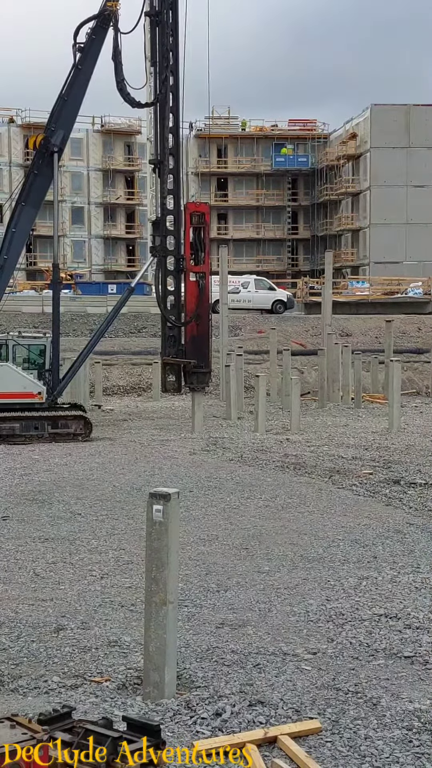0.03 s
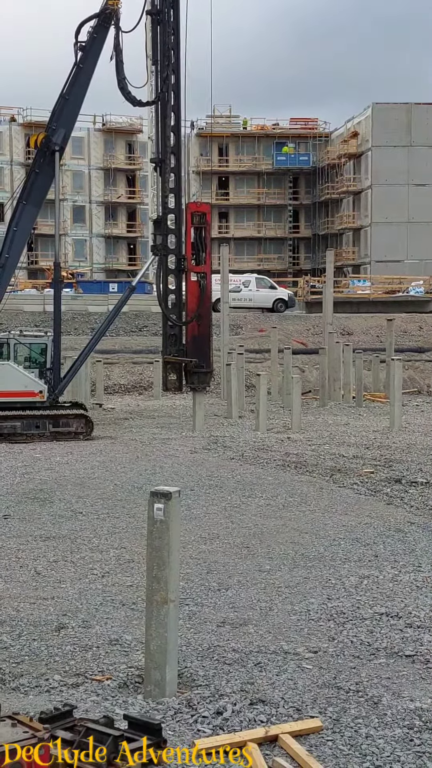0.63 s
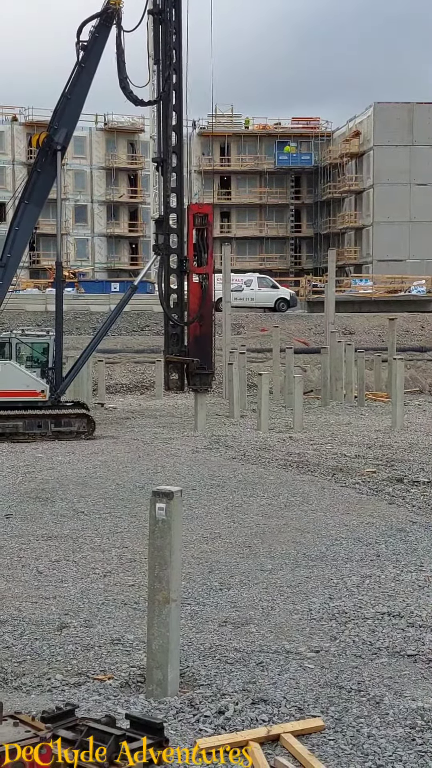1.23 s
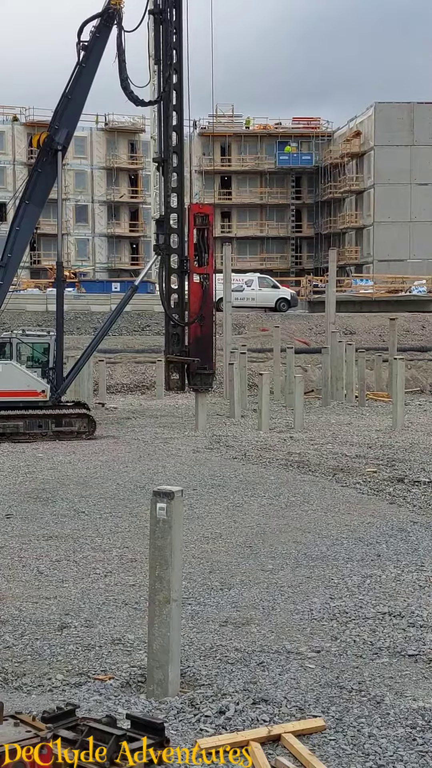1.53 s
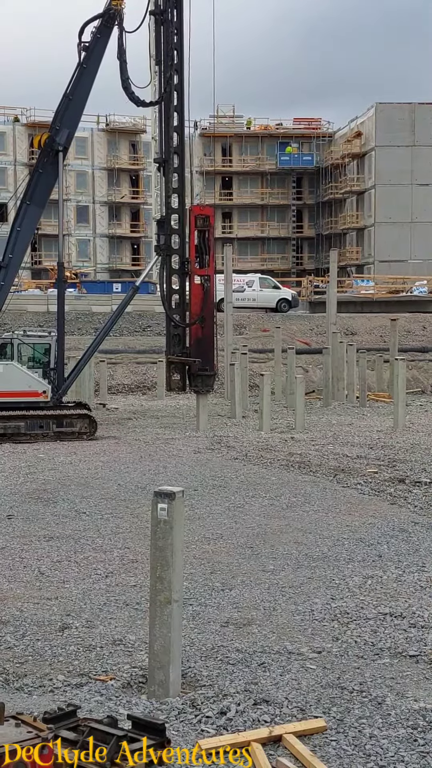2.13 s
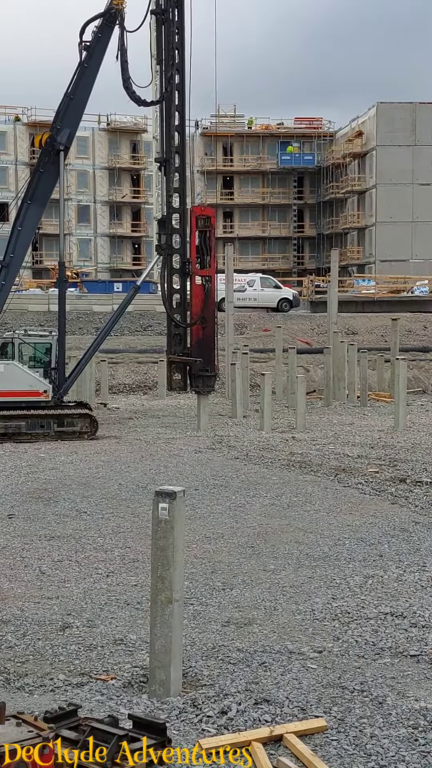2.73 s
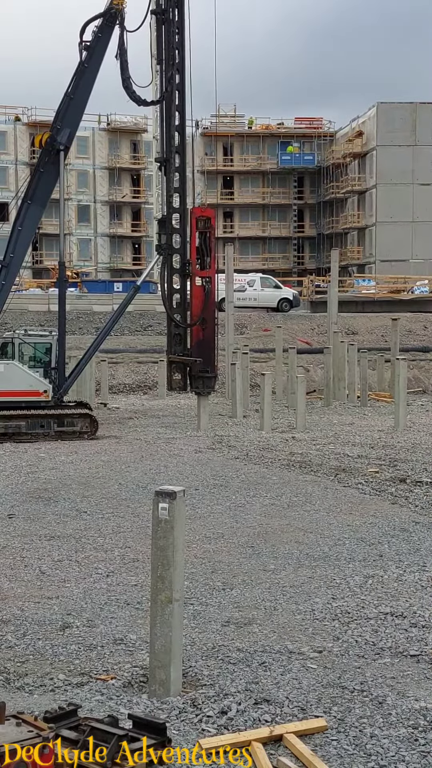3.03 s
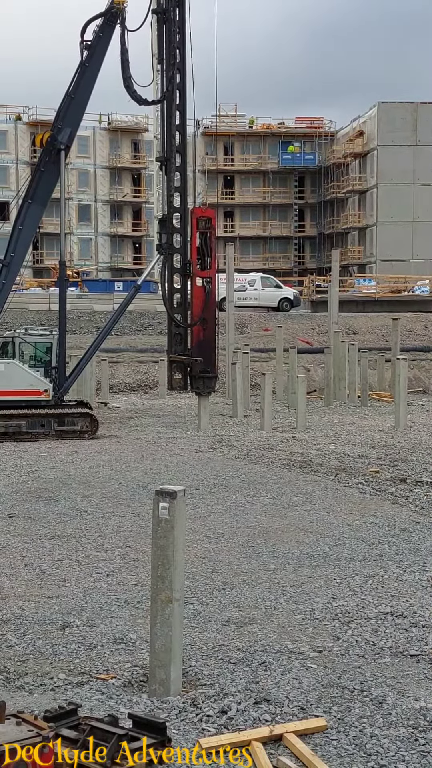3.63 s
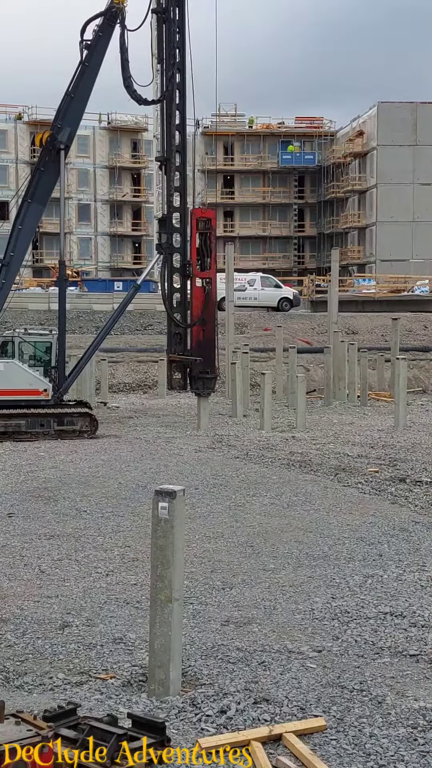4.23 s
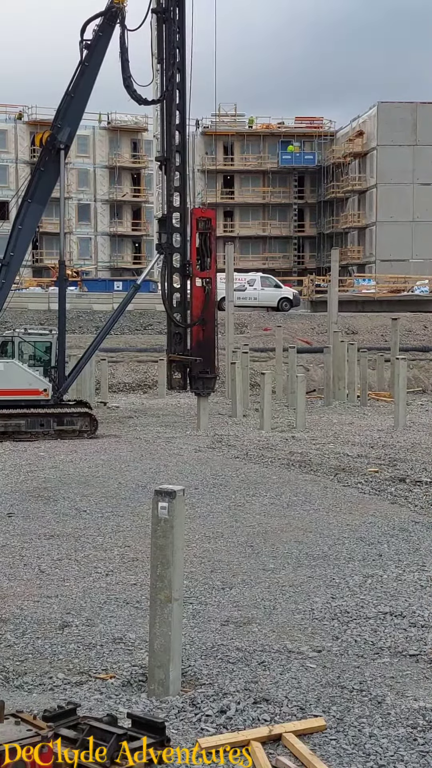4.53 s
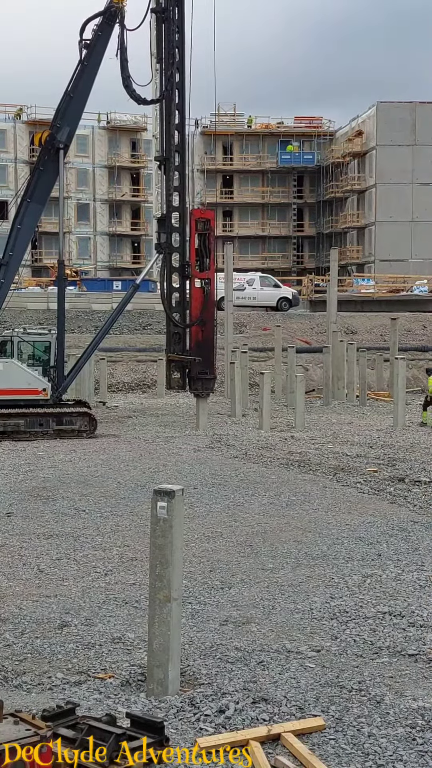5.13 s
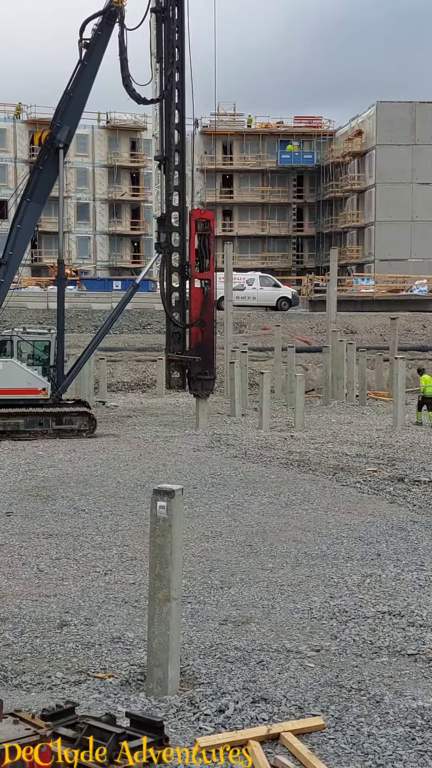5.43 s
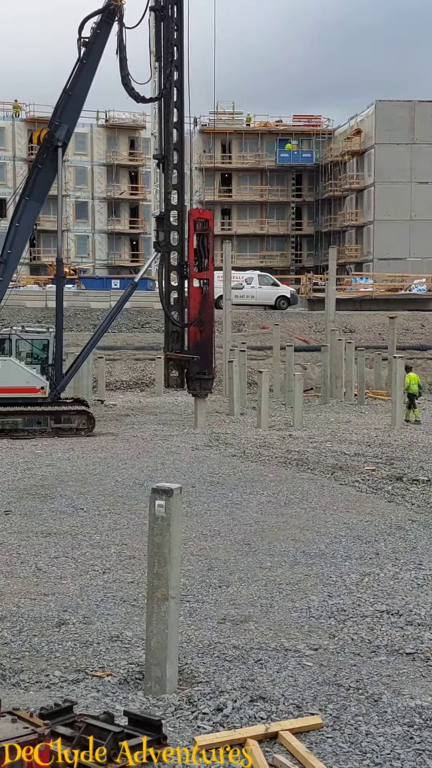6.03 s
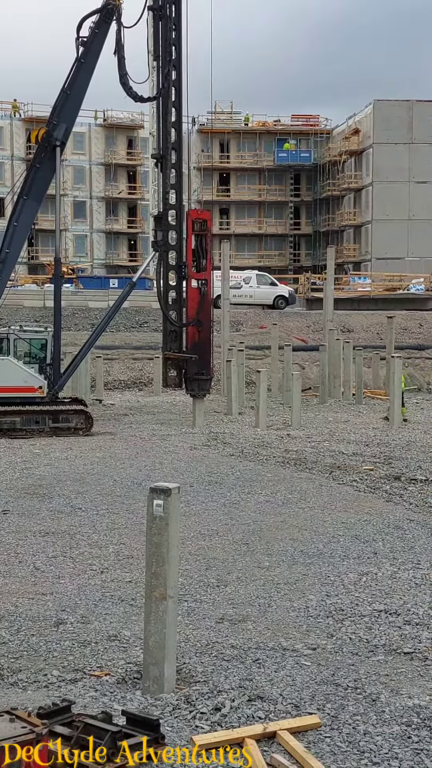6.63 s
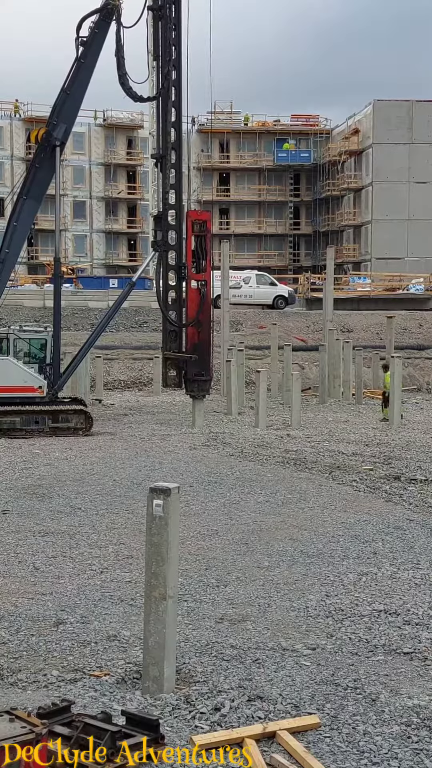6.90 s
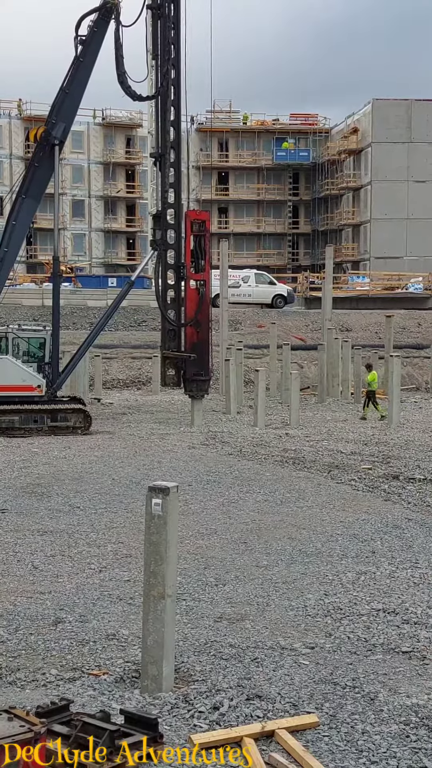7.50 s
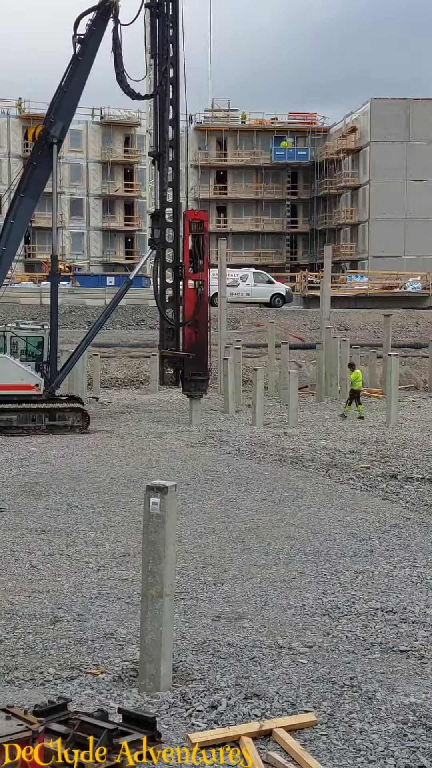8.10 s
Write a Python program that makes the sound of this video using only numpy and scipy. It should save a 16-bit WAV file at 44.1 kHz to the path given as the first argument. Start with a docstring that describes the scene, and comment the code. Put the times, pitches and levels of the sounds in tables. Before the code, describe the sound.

Over the low rumble of a diesel engine, a pile driver pounds away outdoors in an even rhythm of nearly two blows a second. The lift clacks, the ram lands with a sharp, heavy thud, and the steel casing slams and rattles, with light grinding and chain chinks. Each hit rings out across the building site with a short echo. A few low puffs of wind reach the microphone toward the end.

```python
"""A hydraulic drop hammer drives a concrete pile on an open gravel site, about twice a second.
Each blow is a deep thud and a second landing; the steel casing then slams, booms and grinds in its
guides, chains chink, and the lift lets the ram go again with a clack. The rig's diesel drones
underneath, a block of flats throws the noise back, and wind puffs on the microphone near the end."""
import sys
import numpy as np
from scipy import signal
from scipy.fft import rfft, irfft, next_fast_len
from scipy.io import wavfile
from scipy.ndimage import map_coordinates

SR = 44100
rng = np.random.default_rng(int(sys.argv[2]) if len(sys.argv) > 2 else 0)


def file_out(sig):
    """Save sig as 16-bit WAV at sys.argv[1]."""
    # one column per channel
    cols = np.atleast_2d(sig).T
    # limit, then scale
    lim = np.clip(cols, -1, 1)
    pcm = np.round(lim * 32767).astype(np.int16)
    wavfile.write(sys.argv[1], SR, pcm)


N = 368676
TOP_HZ = 15827
FALL_S = .2355  # release to impact

# ram blows: t/s, hop to second landing/s, clatter brightness/dB, grinding/dB, chink/dB
RAM_BLOWS = [(0.1791, 0.026, 0.5, -48, -30), (0.7552, 0.033, -1, -44.5, -27), (1.3221, 0.028, 0, -52, -26),
             (1.8854, 0.029, 1.5, -40, -26), (2.4586, .0313, -0.5, -42, -21.5),
             (3.0237, .0258, 1.5, -40, -18.5), (3.5854, .0235, 0, -40, -19.5),
             (4.15, .0243, -0.5, -46, -36), (4.7088, 0.028, 0.5, -49, -26), (5.264, 0.028, 2, -47, -29),
             (5.8272, 0.025, 1, -55, -23), (6.3968, 0.026, -0.5, -41, -19), (6.9553, 0.025, -1, -60, -34),
             (7.5046, .0232, -1, -60, -32), (8.0667, .0239, 0, -55, -31)]
# two casing slams per blow: delay/s, level/dB, brightness/dB, rise/s, t60/s
CASING_SLAMS = [(.042, -14, -1.9, .013, .2), (.079, -15, 1.3, .006, .25)]


def amp(db):
    """Decibels to gain."""
    return 10 ** (np.asarray(db) / 20)


def unit(x):
    """Scale to rms 1."""
    return x / np.sqrt(np.mean(x ** 2) + 1e-20)


def along(points, hz):
    """Interpolate (f/Hz, value) points over log frequency."""
    f, v = np.transpose(points)
    return np.interp(np.log(hz + 1), np.log(f + 1), v)


def clock(length_s):
    """Sample times."""
    return np.arange(int(length_s * SR)) / SR


def fade(t, t60_s):
    """Exponential decay, 60 dB in t60_s."""
    return np.exp(-np.log(1000) * t / t60_s)


def onset(t, rise_s):
    """Exponential rise to 1."""
    return 1 - np.exp(-t / rise_s)


def add(track, at_s, sound):
    """Mix sound into track; at_s may be negative."""
    start = round(at_s * SR)
    sound = sound[..., max(-start, 0):]
    part = track[..., max(start, 0):][..., :sound.shape[-1]]
    part += sound[..., :part.shape[-1]]


def wobble(rate_hz):
    """Smooth random curve."""
    knots = rng.standard_normal(int(N * rate_hz / SR) + 4)
    return map_coordinates(knots, [np.arange(N) * rate_hz / SR])


def filtered(x, response):
    """Apply response(f/Hz) by FFT."""
    size = next_fast_len(x.shape[-1] + 8192)
    return irfft(rfft(x, size) * response(np.fft.rfftfreq(size, 1 / SR)), size)[..., :x.shape[-1]]


def shaped(x, spectrum):
    """Zero-phase filter from (f/Hz, gain/dB) points."""
    return filtered(x, lambda hz: amp(along(spectrum, hz)))


def through(x, response):
    """Convolve a pair of tracks with an impulse response."""
    return signal.fftconvolve(x, np.atleast_2d(response), axes=1)[:, :N]


def body(spectrum, size=4096):
    """Minimum-phase impulse response, energy 1."""
    cepstrum = irfft(np.log(amp(along(spectrum, np.fft.rfftfreq(size, 1 / SR)))))
    cepstrum[1:size // 2] *= 2
    cepstrum[size // 2 + 1:] = 0
    response = irfft(np.exp(rfft(cepstrum)))
    return response / np.linalg.norm(response)


def hiss(spectrum):
    """Mid/side noise, rms 1."""
    return unit(shaped(rng.standard_normal((2, N)), spectrum))


def rattle(t, t60_s, rise_s, spiky_db):
    """Mid/side force of many small, uneven contacts, dying away."""
    sizes = amp(spiky_db * np.interp(t, np.arange(len(t)) / 700, rng.standard_normal(len(t))))
    return unit(sizes * rng.standard_normal((2, len(t)))) * fade(t, t60_s) * onset(t, rise_s)


def jingle(t, spread_s, t60_s, lowest_hz, count):
    """Mid/side ring of loose parts: one brief note each, later ones weaker."""
    wait, pitch, pan = rng.random((3, count, 1))
    age_s = np.maximum(t + spread_s * np.log(1 - wait), 0)
    hz = lowest_hz + pitch * (TOP_HZ - lowest_hz)
    notes = np.sin(2 * np.pi * hz * age_s) * fade(age_s, t60_s) * (1 - wait) ** .5
    mid = notes.sum(0)
    side = (notes * np.cos(2 * np.pi * pan)).sum(0) * np.sqrt(2)
    return np.array([mid, side]) / np.sqrt(np.sum(mid ** 2) / (SR * spread_s))


def slams(hits, t60_s, rise_s, spiky_db, treble_db, jingle_db, scatter_db=.5):
    """Rattle plus shaken loose parts for each hit (t/s, level/dB, brightness/dB)."""
    force, t = np.zeros((2, N)), clock(.22)
    for at_s, db, bright_db in hits:
        notes = jingle(t, spread_s=.035, t60_s=.04, lowest_hz=4200, count=40)
        hit = rattle(t, t60_s, rise_s, spiky_db) + amp(jingle_db) * notes
        hit = shaped(hit, [(2200, 0), (4200, bright_db + treble_db)])
        add(force, at_s - rise_s / 4, amp(db + rng.normal(0, scatter_db)) * hit)
    return force


def diesel(firing_hz=43.63):
    """Low engine orders, the higher the less steady, over exhaust rumble and site wash."""
    orders = [(1, -35), (2, -32), (3, -42.5)]  # engine orders: multiple of firing rate, level/dB
    exhaust = [(20, -48), (33, -30), (43, -22), (55, 3.5), (70, -3), (88, -6.5), (105, -17), (128, -7.5),
               (180, -11), (300, -53.5)]  # exhaust spectrum: f/Hz, level/dB
    site = [(25, -40), (40, -13), (110, -6.5), (180, -3.5), (300, -6), (450, -6.5), (800, -15),
            (1150, -21.5), (1350, -19.5), (1600, -19.5), (2400, -31), (4800, -39.5), (7000, -48),
            (12500, -65), (16000, -76)]  # ambient spectrum: f/Hz, level/dB
    phase = 2 * np.pi * np.cumsum(firing_hz * (1 + .014 * wobble(5))) / SR
    drone = sum(amp(db + .9 * k * wobble(4)) * np.sin(k * phase + rng.uniform(0, 2 * np.pi))
                for k, db in orders)
    wash = amp(-36.5 + .3 * wobble(5.5)) * hiss(site)
    return drone * np.array([[1], [0]]) + amp(-37.5) * hiss(exhaust) + wash


def lift():
    """The lift lets go of the ram at the top of each stroke: a hollow clack."""
    latch = [(100, -23), (240, -6), (315, 4), (355, 2), (400, 1), (520, -4.5), (780, -12.5), (1130, -10),
             (1350, -20), (1600, -14.5), (1880, -21.5), (2200, -21.5), (4000, -28), (5100, -26.5),
             (6500, -36), (12500, -43), (16000, -51)]  # latch spectrum: f/Hz, level/dB
    releases = [(at_s - FALL_S, -23, -1) for at_s, *_ in RAM_BLOWS]
    force = slams(releases, t60_s=.22, rise_s=.00604, spiky_db=1, treble_db=-6.5, jingle_db=-7.5)
    return amp(4.5) * through(force, body(latch))


def chinks(swing_s=.149, slack_s=.047, slack_db=-30, scatter_s=.013):
    """Chains chink as they swing back after a blow and go slack after a release."""
    # chain spectrum: f/Hz, level/dB
    chain = [(200, -12), (1000, 11.5), (3000, 2.5), (4800, -7), (6500, -16), (8000, -11.5),
             (10000, -17), (12500, -18.5), (16000, -55)]
    force, t = np.zeros((2, N)), clock(.15)
    for at_s, *_, chink_db in RAM_BLOWS:
        for delay_s, db in [(swing_s, chink_db), (slack_s - FALL_S, slack_db)]:
            notes = amp(-6) * jingle(t, spread_s=.012, t60_s=.04, lowest_hz=4200, count=30)
            start_s = at_s + delay_s + rng.normal(0, scatter_s)
            contacts = rattle(t, t60_s=.08, rise_s=.003, spiky_db=2)
            add(force, start_s, amp(db) * (notes + contacts))
    return through(force, body(chain))


def thuds(landing_hz=208, landing_db=8, side_db=-21):
    """The ram rings the pile, hops on its cushion and lands again with a softer onset."""
    pile_modes = [(132.2, -0.13, 0.28), (206.3, -0.8, 0.084), (257, 0.68, 0.014), (372, -0.49, 0.014)]  # pile and driving cap: f/Hz, signed gain, t60/s
    track, t = np.zeros(N), clock(.4)
    ring = sum(gain * np.sin(2 * np.pi * hz * t) * fade(t, t60_s) for hz, gain, t60_s in pile_modes)
    strike = ring * onset(t, .00085)
    landing = -np.sin(2 * np.pi * landing_hz * t) * fade(t, .06) * onset(t, .0075) ** 2
    for at_s, hop_s, *_ in RAM_BLOWS:
        add(track, at_s, strike)
        add(track, at_s + hop_s, amp(landing_db) * landing)
    return np.array([track, -amp(side_db) * track])


def cracks(snap_db=-18, crunch_db=-20, landing_db=-25, cap_db=-1, detune=.0036):
    """Hard edge of a blow: snap, crunch and cap ring; the second landing crunches again."""
    cap_modes = [(734, -31.5, 0.42), (998, -24.5, 0.039), (1110, -17, 0.033), (1650, -35.5, 0.15),
                 (2140, -44, 0.2), (2356, -38, 0.73), (2600, -40, 0.066), (3610, -38, 0.076),
                 (4300, -43, 0.08), (5020, -36, 0.03), (5520, -37.5, 0.022)]  # steel cap on the pile head: f/Hz, level/dB, t60/s
    impact = [(120, -23), (330, 11), (600, -5.5), (800, -5), (1100, -8), (1350, -15.5), (1650, -7),
              (1900, -19.5), (2400, -12), (3100, -26), (5200, -25.5), (6500, -40), (13000, -46.5),
              (16000, -66)]  # impact spectrum: f/Hz, level/dB
    force, ring, t = np.zeros((2, N)), np.zeros((2, N)), clock(.2)
    for at_s, hop_s, *_ in RAM_BLOWS:
        snap = np.diff(rattle(t, t60_s=.02, rise_s=.0002, spiky_db=1))
        crunch = rattle(t, t60_s=.25, rise_s=.00054, spiky_db=1)
        landing = rattle(t, t60_s=.066, rise_s=.0025, spiky_db=6)
        add(force, at_s - .0022, amp(snap_db) * snap)
        add(force, at_s - .001, amp(crunch_db) * crunch)
        add(force, at_s + hop_s - .008, amp(landing_db) * landing)
        notes = 0
        for hz, db, t60_s in cap_modes:
            envelope = amp(db + rng.normal(0, 2.6, (2, 1))) * fade(t, t60_s)
            cycles = hz * rng.normal(1, detune) * t + rng.random((2, 1))
            notes += envelope * np.sin(2 * np.pi * cycles)
        add(ring, at_s - .001, amp(cap_db) * notes * onset(t, .0005))
    return through(force, body(impact)) + ring


def boom(mode_hz=391, start_db=-8, t60_s=.23, rise_s=.013, delay_s=.039, settle_db_per_s=1.1):
    """The first slam excites the casing's main mode, less as the pile sinks."""
    track, t = np.zeros(N), clock(.3)
    for at_s, *_ in RAM_BLOWS:
        tone = np.sin(2 * np.pi * (mode_hz * rng.normal(1, .012) * t + rng.random()))
        gain = amp(start_db - settle_db_per_s * at_s)
        add(track, at_s + delay_s, gain * tone * fade(t, t60_s) * onset(t, rise_s))
    return track


def clatter(ring_db=-10, settle_db_per_s=.24):
    """The casing slams twice in its guides and rings, softer as the pile sinks."""
    casing_modes = [(320, -44, .06), (383.8, 2, 0.12), (641, -8.5, 0.086), (740, -42, 0.29),
                    (1178, 4.5, 0.024), (1556, -3, 0.033), (1721, 3, 0.024), (2096, 6, 0.02),
                    (2370, -11.5, .16), (2414, 1.5, 0.032), (2800, 1.5, 0.021), (3035, -2.5, 0.044),
                    (3380, 3.5, 0.02), (4660, -26, .05), (5300, -16, 0.071), (7000, -4, .06),
                    (11800, 7, .06), (13080, -6, .14)]  # steel casing: f/Hz, level/dB, t60/s
    steel = [(30, -36.5), (80, 5), (200, 1.5), (450, 4), (800, 0.5), (1150, -4.5), (1350, -8.5),
             (1600, -5.5), (1880, -13.5), (2200, -12.5), (3800, -17.5), (4900, -20.5), (6500, -30.5),
             (9500, -35.5), (12500, -35), (16000, -47)]  # broad casing spectrum: f/Hz, level/dB
    force, t = np.zeros((2, N)), clock(.4)
    for delay_s, db, edge_db, rise_s, t60_s in CASING_SLAMS:
        hits = [(at_s + delay_s, db - settle_db_per_s * (at_s - N / SR / 2), bright_db + edge_db)
                for at_s, _, bright_db, *_ in RAM_BLOWS]
        force += slams(hits, t60_s, rise_s, spiky_db=1.8, treble_db=-3, jingle_db=-5)
    modes = sum(amp(db) * np.cos(2 * np.pi * hz * t) * fade(t, t60_s) / np.sqrt(t60_s)
                for hz, db, t60_s in casing_modes)
    ringing = through(force, amp(ring_db) * modes / np.linalg.norm(modes))
    return through(force + ringing, body(steel))


def scrapes(delay_s=.086, half_length_s=.037, grit_db=3):
    """Dry steel grinds on steel: a gritty sizzle that sets in faster than it dies."""
    grit = [(2500, -30), (5000, 5.5), (7000, -1.5), (9500, -6.5), (12000, 1.5), (12850, -8), (13080, 9),
            (13230, -1), (13360, 5), (13600, -8), (14800, -17), (16000, -30)]  # grinding spectrum: f/Hz, level/dB
    from_peak = (clock(.3) - delay_s) / half_length_s
    stroke = np.exp(-.5 * np.abs(from_peak) ** np.where(from_peak < 0, 4, 2))
    envelope = np.zeros(N)
    for at_s, _, _, grind_db, _ in RAM_BLOWS:
        add(envelope, at_s, amp(grind_db) * stroke)
    return envelope * unit(hiss(grit) * amp(grit_db * wobble(300)))


def squeaks(squeal_hz=13080, squeal_t60_s=.16, trim_db=-1):
    """Narrow, rough tones: the guides squeak when they bind and squeal from each second slam."""
    binds = [(1.404, 4600, -26, 0.065), (1.961, 13230, -30, .12), (5.908, 4580, -23.5, 0.051),
             (6.48, 4500, -28, .07), (6.512, 4700, -28, .06), (7.033, 4550, -26, 0.055),
             (7.055, 4430, -25.5, .06), (7.072, 4560, -25, .06)]  # binding guides: t/s, f/Hz, level/dB, t60/s
    second_slam_s = CASING_SLAMS[1][0]
    squeals = [(at_s + second_slam_s, squeal_hz, grind_db, squeal_t60_s)
               for at_s, _, _, grind_db, _ in RAM_BLOWS]
    track, t = np.zeros((2, N)), clock(.4)
    for at_s, pitch_hz, db, t60_s in binds + squeals:
        half_width_hz = 11 / t60_s
        noise = rng.standard_normal((2, len(t)))
        tone = unit(filtered(noise, lambda hz: 1 / (1 + ((hz - pitch_hz) / half_width_hz) ** 2)))
        add(track, at_s, amp(db + trim_db) * tone * fade(t, t60_s) * onset(t, .00082))
    return track


def tinkles(gain_db=-53, delay_s=.13):
    """Shaken shackles and cables tinkle on faintly after each blow."""
    track, t = np.zeros((2, N)), clock(.45)
    for at_s, *_ in RAM_BLOWS:
        notes = jingle(t, spread_s=.11, t60_s=.09, lowest_hz=6000, count=14)
        add(track, at_s + delay_s, amp(gain_db) * notes)
    return shaped(track, [(13300, -4.5), (15500, -18)])


def wind(sigma_s=.015, side_db=-3):
    """Short low puffs, partly different on the two microphone ports."""
    puffs = [(7.228, -25), (7.274, -26), (7.345, -32), (7.463, -32), (7.784, -26.5), (7.91, -28),
             (8.007, -32)]  # wind puffs: t/s, level/dB
    buffet = [(20, -45), (50, -16), (110, -4.5), (200, -15), (400, -24), (1200, -62)]  # buffeting spectrum: f/Hz, level/dB
    t = np.arange(N) / SR
    envelope = sum(amp(db) * np.exp(-.5 * ((t - at_s) / sigma_s) ** 2) for at_s, db in puffs)
    mid, side = hiss(buffet) * envelope
    return mid + amp(side_db) * np.array([side, -side])


def yard(x, tail_db=-7, tail_rise_s=.0067, wall_db=-13, wall_delay_s=.072):
    """Smeared echo off the flats and a long site tail; moving air changes both every 1/3 s."""
    decay = [(100, 0.95), (400, 0.79), (1500, 1.11), (5000, 0.82), (13000, 0.87)]  # site reverberation: f/Hz, t60/s
    echoes, block = np.zeros((2, N)), SR // 3
    for start in range(0, N, block):
        hz, t, bands = signal.stft(rng.standard_normal((2, SR)), SR, nperseg=256)
        bands = bands * fade(t, along(decay, hz)[:, None]) * onset(t, tail_rise_s)
        _, tail = signal.istft(bands, SR, nperseg=256)
        response = amp(tail_db) * tail / np.linalg.norm(tail[0])
        wall = rattle(clock(.1), t60_s=.07, rise_s=.003, spiky_db=4)
        add(response, wall_delay_s, amp(wall_db) * wall / np.linalg.norm(wall[0]))
        add(echoes, start / SR, through(x[:, start:start + block], response))
    return echoes


def ports(mid, side, near_db=-9, left_lead_s=11e-6):
    """Mid/side to left/right: close reflections widen the treble; the left port hears the rig first."""
    close = rng.standard_normal(round(.004 * SR))
    scatter = amp(near_db) * signal.fftconvolve(mid, close / np.linalg.norm(close))[:N]
    side = side + shaped(scatter, [(200, -25), (600, -20), (1500, .5), (5000, 4.5), (12000, -19)])
    advance_s = left_lead_s / 2 * np.array([[1], [-1]])
    return filtered(np.array([mid + side, mid - side]), lambda hz: np.exp(2j * np.pi * hz * advance_s))


def scene():
    """Rig and echoes mix as mid/side; wind blows straight on the ports."""
    width = [(60, -14), (130, -14), (290, -15), (640, -12), (1400, -9), (3100, -9), (7000, -8), (13000, -9)]  # side channel gain: f/Hz, level/dB
    steel = cracks() + clatter() + lift() + chinks()
    thud_mid, thud_side = thuds()
    friction = squeaks() + scrapes()
    direct = steel + friction + tinkles()
    echoes = yard(steel + amp(-11) * friction + amp(-6) * thud_mid)
    mid, side = direct + echoes + diesel()
    return ports(mid + thud_mid + boom(), shaped(side, width) + thud_side) + wind()


def record(dry):
    """Brick-wall low-pass at TOP_HZ."""
    return filtered(dry, lambda hz: hz < TOP_HZ)


dry = scene()
out = record(dry)
file_out(out)
```